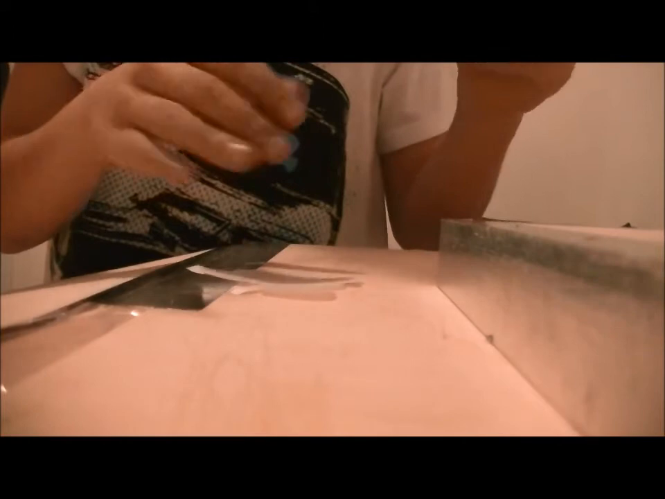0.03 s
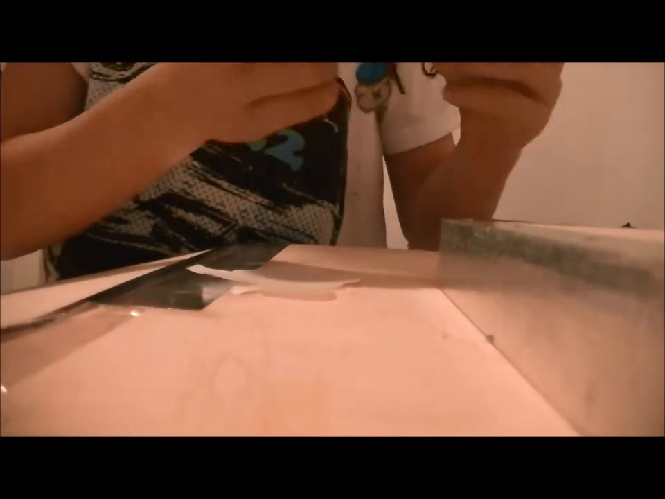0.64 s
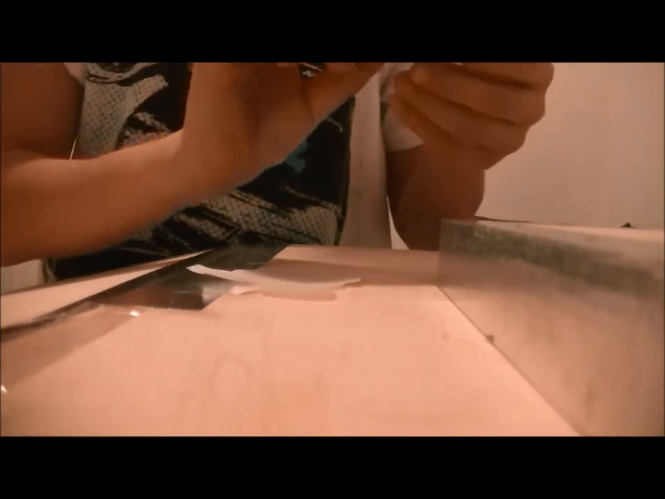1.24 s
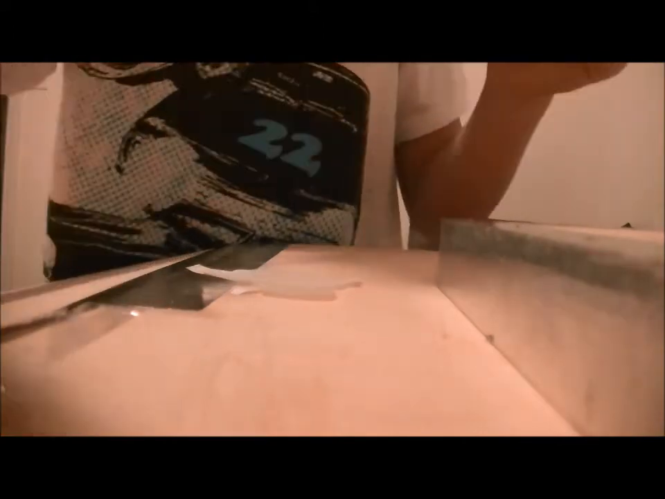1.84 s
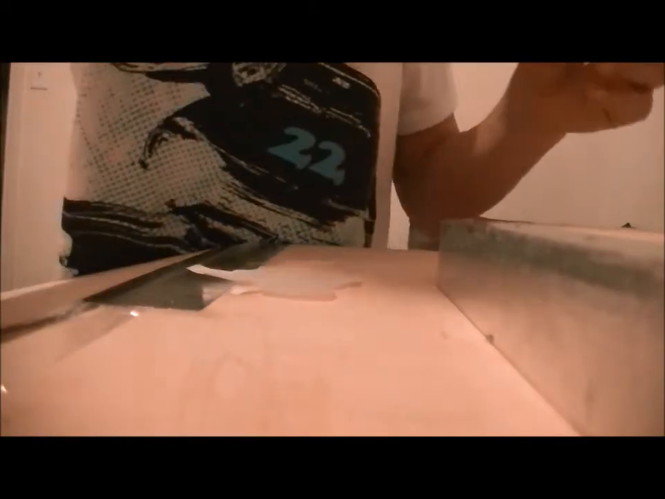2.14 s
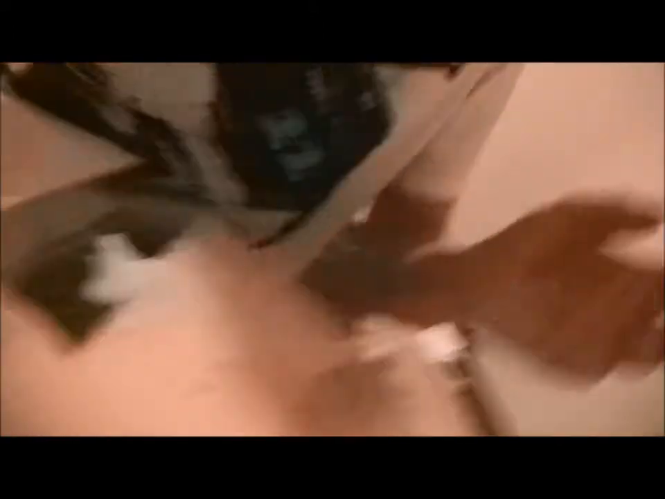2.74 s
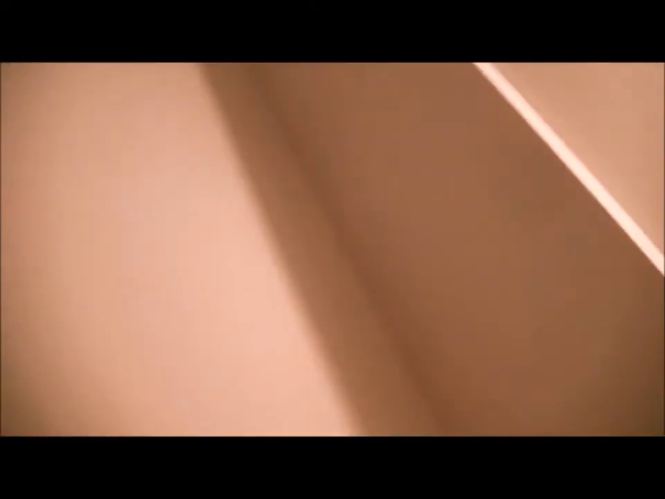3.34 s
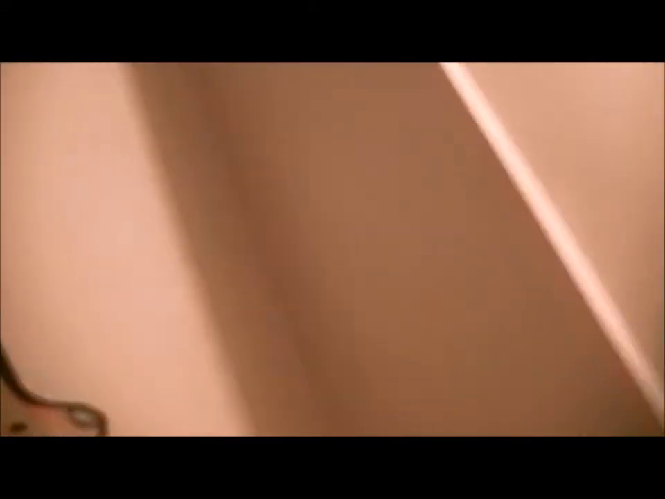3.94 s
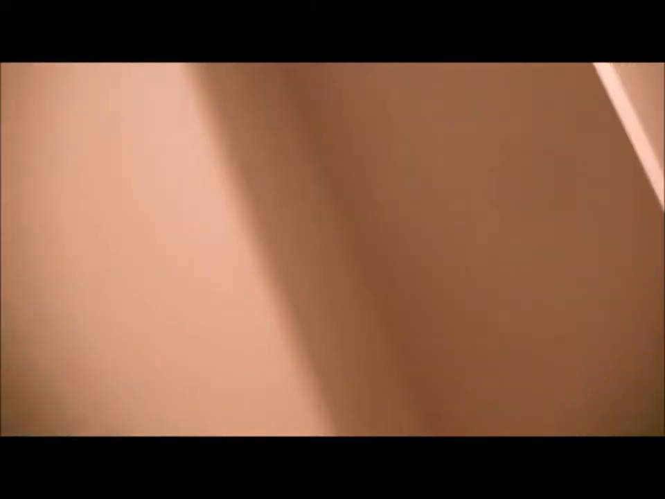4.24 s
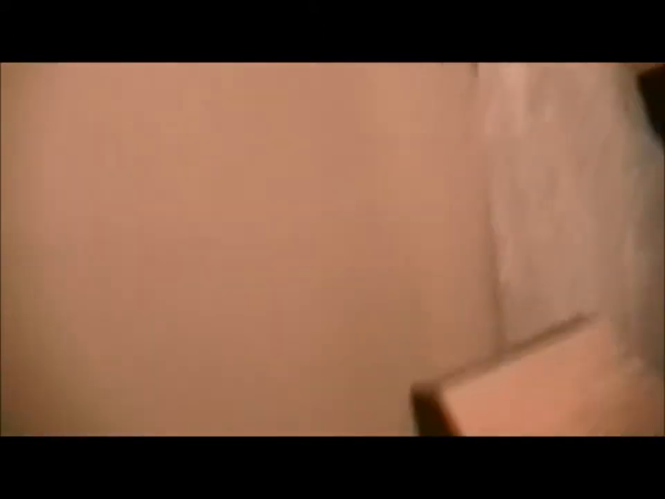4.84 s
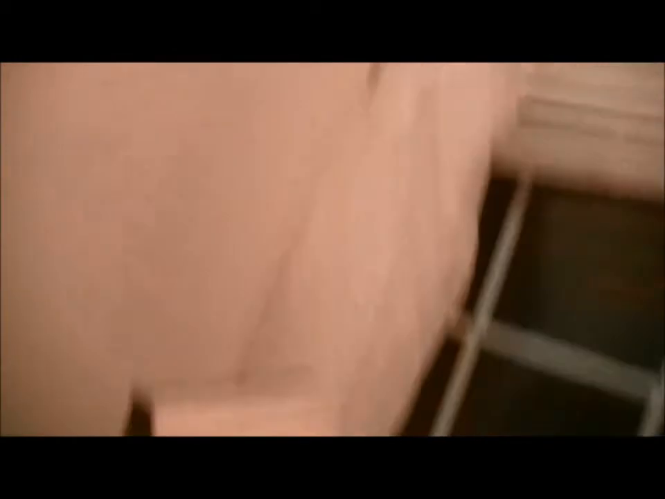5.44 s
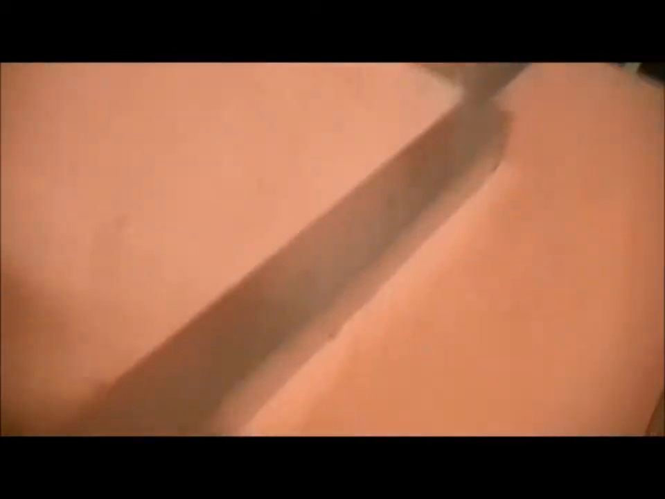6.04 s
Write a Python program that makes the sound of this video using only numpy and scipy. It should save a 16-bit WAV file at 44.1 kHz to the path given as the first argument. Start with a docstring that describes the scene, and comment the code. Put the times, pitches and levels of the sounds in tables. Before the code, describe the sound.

In a quiet room with a steady hiss, tape and paper are fiddled with over a table, giving small snaps and a faint rustle. A sleeve swishes as an arm reaches for the camera, which knocks loudly on the table, judders briefly and knocks again. Then it is carried: right at the microphone, fingers hiss and squeak on the plastic shell, with clicks, low bumps and a few lighter knocks.

```python
"""In a quiet room, tape and paper are fiddled with over a table: small snaps and a faint rustle.
Near 2 s a sleeve swishes as an arm reaches out and grabs a camera. The camera knocks on the table,
judders briefly over its top and knocks again, and both ring with the blows.
Then it is carried: sliding fingers make the plastic shell hiss and squeak, and the shifting grip
gives clicks, low bumps and a few lighter knocks."""
import sys
import numpy as np
from scipy import signal
from scipy.io import wavfile

SR = 44100
rng = np.random.default_rng(int(sys.argv[2]) if len(sys.argv) > 2 else 0)


def wrap_up_sound(samples):
    """Save the sound to the file named by the first command line argument, as 16-bit audio."""
    columns = np.atleast_2d(samples).T
    # keep every value between -1 and 1, then stretch to whole-number steps
    tamed = np.clip(columns, -1, 1)
    steps = np.round(tamed * 32767).astype(np.int16)
    wavfile.write(sys.argv[1], SR, steps)


N = 269004
TIME = np.arange(N) / SR

# Tone colours, or how strong each pitch is in a noise: f/Hz, level/dB
BACKGROUND_COLOUR = [(15, -71), (25, -35), (64, -2.5), (190, -1.5), (229, -4), (354, -4), (962, -10.5),
                     (2550, -13.5), (2840, -13.5), (3340, -14), (3920, -14), (4250, -19), (4740, -15.5),
                     (16000, -26)]  # steady hiss of room and microphone
RUSTLE_COLOUR = [(300, -32), (1400, -5), (3000, 0), (6500, 1), (9000, -0.5), (12000, -16), (16000, -22)]  # tape and paper
SLEEVE_COLOUR = [(100, -11), (480, 0.5), (1000, -4), (1400, -7.5), (2400, -2.5), (4000, -5.5),
                 (7000, -13.5), (15000, -29)]  # brushing cloth
BUMP_COLOUR = [(30, -25), (70, -2), (130, 4), (300, -0.5), (600, -6.5), (900, -1.5), (1500, -20)]  # the shifting grip
DRAG_COLOUR = [(40, -28), (80, -15), (140, 2.5), (280, -5), (430, -3), (580, -1.5), (850, -11), (1200, -9),
               (1700, -29), (3000, -49)]  # the camera's foot on the table
THUD_COLOUR = [(40, -11), (130, 5), (400, 5), (800, 2), (1300, -15.5), (3000, -76)]  # low part of a snap
RING_COLOUR = [(250, -52.5), (650, -11), (1000, -0.5), (1450, 2), (2400, 0.5), (3200, -7), (5500, -54.5)]  # middle part of a snap or rub
CRACK_COLOUR = [(1200, -31.5), (2600, -9), (3500, 5), (4800, 4.5), (5700, 8), (7800, 1.5), (9500, -3),
                (13000, -45)]  # high part of a snap
SNAP_FIZZ_COLOUR = [(4000, -37.5), (7500, -1), (9500, -4.5), (11000, -8), (12500, -13.5), (16000, -20.5)]  # very top of a snap
RUB_HISS_COLOUR = [(1500, -35), (2700, -6.5), (3500, 9.5), (4500, 8), (6300, 6.5), (7700, 1.5),
                   (8600, -12.5), (12000, -23)]  # high part of a rub
RUB_FIZZ_COLOUR = [(4000, -75.5), (8000, 4), (9500, 0.5), (11200, -0.5), (12500, -4.5), (14500, -10),
                   (16000, -30)]  # very top of a rub
# Faint electronic tones: f/Hz, level/dB
WHINE_TONES = [(2880, -73.5), (3847, -74.5), (7690, -83)]
# How long the room echoes (a fade time is the time to drop by 60 dB): f/Hz, fade time/s
ROOM_FADES = [(100, 0.18), (500, 0.56), (2000, 0.36), (7000, 0.25), (16000, 0.072)]
# Modes, the pitches at which a thing likes to ring: f/Hz, width/Hz, level/dB
TAPE_MODES = [(1280, 98, -2), (1640, 190, -10), (2410, 310, 5), (4320, 200, -7), (6960, 590, 3)]  # taut tape
SHELL_MODES = [(1183, 37, 2.5), (1342, 58, 6.5), (1748, 200, 7), (1855, 470, 15), (2197, 280, 13),
               (2350, 85, -16.5)]  # the camera's plastic shell
WALL_MODES = [(3390, 470, -3.5), (4470, 130, 5.5), (5470, 140, 6), (6700, 480, -13), (7330, 340, 9.5),
              (7840, 290, -6)]  # its thin walls, which ring higher
# Camera and table ringing together: f/Hz, level/dB, fade time/s
TABLE_MODES = [(97, -34, 0.47), (139, -44, 0.081), (158.5, -8, 0.056), (290, -11, 0.029), (341, -17, 0.12),
               (347, -1.5, 0.047), (457.5, -17, 0.15), (566, -6, 0.068), (660, 9.5, 0.016),
               (823, -40, 0.048), (1070, -42, 0.046), (1204, -15, 0.036)]

# Movements (swell is the change in level from start to end): t/s, length/s, level/dB, swell/dB
CRINKLES = [(0.296, 0.048, -51, -2), (0.523, 0.062, -49, 7), (0.6, 0.093, -58, -8), (0.844, 0.03, -53.5, 1),
            (0.935, 0.1, -61, 5), (1.165, 0.135, -55, 5), (1.335, 0.035, -55.5, 2), (1.473, 0.012, -53, 0)]  # tape and paper bend between the fingers
SWISHES = [(1.904, 0.45, -49, -18.5)]  # the arm reaches out, fastest at first
DRAGS = [(2.388, 0.1, -22.5, 10)]  # the camera is dragged, pressed ever harder
# Snaps, with three parts set against their level: t/s, relative level/dB, thud/dB, crack/dB, fizz/dB
TAPE_SNAPS = [(0.3137, -49, -21, 8.5, -5), (0.3296, -52, -15, 18.5, 18), (0.5853, -37, -26, -3, 2),
              (0.5876, -37.5, -25, 18, -19), (0.5890, -29, -24, 7.5, -3.5), (0.5905, -26.5, -25, -2.5, -31),
              (0.7401, -40.5, -29, 4, -0.5), (0.8212, -42.5, -9, -6, -19), (0.9427, -65, -8, 12, 19.5),
              (0.9884, -61, -2, 13, 12), (1.1854, -59, -10, 12, 6), (1.2003, -55.5, -3, 15, 13),
              (1.2362, -58.5, -10, 16, 10), (1.2478, -48.5, -6, -2, 5), (1.2627, -35.5, -11.5, 4.5, 7.5),
              (1.2725, -44, -10, -16, -4), (1.2880, -48, 1, -11, -16), (1.3774, -56, -18, 13, 17.5),
              (1.4835, -53.5, -13, 6.5, 1)]  # tape and paper
SHELL_CLICKS = [(2.3298, -46, -16, 3, 9.5), (2.3814, -25, 10.5, 1.5, -3.5), (2.3873, -32, -2, -11, -13),
                (2.5411, -31, -9, 1, -13), (2.7065, -38.5, 12, -2.5, -11), (2.8051, -42, -4, -0.5, -6),
                (2.9374, -26.5, -9.5, -12, -28), (3.1627, -39, -21, -11, -17), (3.541, -46, 5.5, -9, -26),
                (3.623, -31.5, -9, -26, -30), (3.6322, -42, -2, -4, -16), (3.6645, -36.0, -7, -13, -7),
                (3.69, -36.5, -1, -23, -29), (3.7999, -41, -7, -2, -20), (4.321, -19.5, -10, -11, -26),
                (4.3446, -28, -34, -1, -2.5), (4.3505, -34.5, -27, 9, 3), (4.5843, -43, -16, -3.5, -24),
                (4.7366, -35, -18, -16, -27), (4.932, -42, -17, -3, -4), (4.9994, -47.5, -16, 2, 1),
                (5.1693, -46.5, -9, -2, 7), (5.3301, -30.5, -38, -26, -28), (5.695, -36.5, -19, -16, -22),
                (5.7582, -21.5, -48, 0.5, -18), (5.7908, -37.5, -25, 1, -7), (5.805, -30.5, -33, -6, -8),
                (5.8126, -32, -22, -5, -12), (5.9001, -16, -17.5, -4, -0.5), (6.0384, -34.5, -20, 1.5, 6.5),
                (6.0526, -29, -10, -4.5, -8)]  # plastic under the grip
# Shifts of the grip: t/s, length/s, relative level/dB
GRIPS = [(2.256, 0.2, -46), (2.79, 0.078, -48.5), (2.99, 0.25, -52), (3.53, 0.1, -57.5), (3.597, 0.2, -49),
         (4.007, 0.09, -47.5), (4.156, 0.12, -61), (4.648, 0.15, -57), (4.855, 0.051, -52),
         (5.772, 0.059, -45.5), (5.957, 0.085, -52)]
# Finger strokes, with two parts set against their level:
# t/s, length/s, level/dB, swell/dB, hiss/dB, fizz/dB
RUBS = [(2.227, 0.083, -41.5, 5, -2, -14), (2.368, 0.12, -36, 4, -5.5, -15.5),
        (2.586, 0.09, -50, -1, -11, -25), (2.79, 0.037, -45, -3, -14, -27),
        (2.86, 0.065, -39, -5, -5.5, -10.5), (3.04, 0.13, -58, 4, 1, -9), (3.19, 0.03, -47, -2, -1.5, -15),
        (3.324, 0.16, -59, 5, -18, -25), (3.494, 0.079, -51, 2, -19, -24),
        (3.578, 0.044, -50.5, -13, 2, -12), (3.659, 0.019, -36, -23, -1.5, -13),
        (3.713, 0.051, -42.5, -0.5, -6, -20), (3.783, 0.012, -43.5, 1, -14, -13),
        (3.846, 0.093, -48.5, 4, -4.5, -12), (3.926, 0.098, -39.5, 0, -8, -14),
        (4.012, 0.088, -36, 3, -4.5, -12), (4.119, 0.037, -38, -7, -8, -17),
        (4.161, 0.095, -40, 0.5, -1, -16), (4.266, 0.069, -41, 15, -10.5, -19),
        (4.353, 0.33, -52, -12.5, -3, -7.5), (4.639, 0.05, -47.5, -13, 0.5, 3),
        (4.68, 0.18, -55, 6, -1.5, -8), (4.821, 0.11, -40, -1.5, 4, -5), (5.027, 0.14, -47.5, 2.5, -2, -7),
        (5.179, 0.056, -40, 3.5, 2.5, -1), (5.258, 0.2, -41.5, 9.5, -0.5, -4),
        (5.464, 0.096, -42.5, 5, 1, -0.5), (5.566, 0.18, -45, -1, -1.5, -5.5),
        (5.809, 0.045, -36, 1, -6, -12), (5.851, 0.031, -32, 4.5, -3, -9), (5.909, 0.1, -47, 2, -4, -10)]
# Skin squeaks where it grips hardest, and a thin ring near 4.4 kHz in two strokes: t/s, length/s, level/dB,
# f/Hz
SQUEAKS = [(2.276, 0.1, -42.5, 1635), (2.885, 0.08, -44, 2110), (3.587, 0.043, -53, 4370),
           (3.653, 0.027, -46, 1600), (3.712, 0.03, -52, 4360), (4.824, 0.04, -36.5, 1850),
           (5.123, 0.029, -44, 1680), (5.265, 0.044, -40, 1710)]
# Blows, and the ring of the spot they hit, set against the blow:
# t/s, relative level/dB, contact time/ms, spot f/Hz, spot level/dB
KNOCKS = [(0.819, -39, 2.1, 149, -6), (1.288, -35, 2.8, 130, -12), (2.38, -4, 1.1, 312, -20),
          (2.3862, 2, 2.4, 166, -15), (2.3968, 2, 2.47, 262, -7), (2.4275, -29, 1.1, 332, -18),
          (2.4618, -20.5, 0.93, 144, -12), (2.471, -14, 0.87, 545, 4), (2.7065, -39, 0.42, 441, 23.5),
          (2.7108, -34.5, 1, 106, 4), (3.622, -38.5, 1.1, 687, 6), (4.3205, -27, 2, 326, 11.5),
          (6.0526, -33, 1.7, 156, -1.5)]


def amp(db):
    """Turns decibels into a number to multiply by."""
    return 10 ** (np.asarray(db) / 20)


def evened(x):
    """Scales a sound to an average power of 1."""
    return x / np.sqrt(np.mean(x ** 2) + 1e-20)


def value_at(points, hz):
    """Looks up a pitch in a table, filling in between its rows."""
    f, value = np.transpose(points)
    return np.interp(np.log(hz + 1), np.log(f), value)


def add(mix, start_s, sound):
    """Mixes a sound in at the given time."""
    part = mix[round(start_s * SR):][:len(sound)]
    part += sound[:len(part)]


def wander(per_s):
    """A random line that heads for a new value per_s times a second."""
    return np.interp(TIME * per_s, np.arange(N), rng.standard_normal(N))


def colour(x, points, size=4096):
    """Gives a sound a tone colour, with nothing heard ahead of its start."""
    log_gain = np.log(amp(value_at(points, abs(np.fft.fftfreq(size, 1 / SR)))))
    taps = np.fft.ifft(np.exp(np.conj(signal.hilbert(log_gain)))).real
    return signal.oaconvolve(x, taps[:size // 2])[:len(x)]


def resonate(x, modes):
    """Lets a sound set a thing's modes ringing."""
    return sum(amp(db) * signal.lfilter(*signal.iirpeak(hz, hz / width, SR), x)
               for hz, width, db in modes)


def glide(x, hz, width_hz):
    """Lets a sound ring at one moving pitch."""
    turn = np.exp(2j * np.pi * np.cumsum(hz) / SR)
    decay = np.exp(-np.pi * width_hz / SR)
    return (turn * signal.lfilter([1], [1, -2 * decay, decay ** 2], x / turn)).real


def strokes(starts, lengths, levels_db, swells_db=0, *, rise_s, fade_s):
    """Loudness over time of some movements: each rises, swells or sinks, then dies away."""
    power = np.zeros(N)
    for start, length, db, swell_db in np.broadcast(starts, lengths, levels_db, swells_db):
        t = np.arange(0, length + fade_s, 1 / SR)
        held_db = db + swell_db * (np.minimum(t / length, 1) - 0.5)
        lift_db = -60 * np.maximum(t - length, 0) / fade_s
        add(power, start, (np.minimum(t / rise_s, 1) * amp(held_db + lift_db)) ** 2)
    return np.sqrt(power)


def friction(slips_per_s, spread_db, smooth, flutter_db, flutter_hz):
    """Rubbing: tiny uneven slips over smooth noise, in clumps as the pressure wavers."""
    sizes = amp(spread_db * np.minimum(rng.exponential(1, N), 4))
    slips = sizes * rng.choice([-1, 1], N) * (rng.random(N) < slips_per_s / SR)
    sliding = evened(slips) + smooth * rng.standard_normal(N)
    return evened(sliding * amp(flutter_db * wander(flutter_hz)))


def background(hiss_db=-54):
    """Steady hiss with a few thin electronic tones."""
    whine = sum(amp(db) * np.sqrt(2) * np.sin(2 * np.pi * hz * TIME) for hz, db in WHINE_TONES)
    return amp(hiss_db) * evened(colour(rng.standard_normal(N), BACKGROUND_COLOUR)) + whine


def room_echo(x, build_s=0.002):
    """Sound bounces around a small room, each pitch dying at its own speed."""
    hz, t, noise = signal.stft(rng.standard_normal(SR // 2), SR, nperseg=256)
    fade = amp(-60 * t / value_at(ROOM_FADES, hz)[:, None])
    tail = signal.istft(noise * fade, SR, nperseg=256)[1]
    tail *= 1 - np.exp(-(TIME[:len(tail)] / build_s) ** 2)
    return signal.fftconvolve(x, tail / np.linalg.norm(tail))[:N]


def stray_ticks(level_db=-66.5, per_s=16, spread_db=3):
    """Fingernails and creases give faint ticks all along."""
    sizes = amp(spread_db * np.minimum(rng.exponential(1, N), 2))
    ticks = sizes * (rng.random(N) < per_s / SR)
    return amp(level_db) * evened(colour(ticks, RUSTLE_COLOUR))


def rustle():
    """Tape and paper crinkle finely as they bend."""
    bending = strokes(*np.transpose(CRINKLES), rise_s=0.0066, fade_s=0.1)
    creases = friction(1500, spread_db=3.2, smooth=0.6, flutter_db=1.2, flutter_hz=81.1)
    return bending * evened(colour(creases, RUSTLE_COLOUR))


def sleeve_swish():
    """Cloth brushes along as the arm reaches out."""
    reach = strokes(*np.transpose(SWISHES), rise_s=0.1, fade_s=0.2)
    cloth = friction(2200, spread_db=3.5, smooth=0.77, flutter_db=1.4, flutter_hz=80)
    return reach * evened(colour(cloth, SLEEVE_COLOUR))


def grip_bumps(gain_db=-1, restless_from_s=1.9):
    """Shifts of the grip make low, lumpy bumps, and the hand never quite rests."""
    shifts = strokes(*np.transpose(GRIPS), rise_s=0.017, fade_s=0.3)
    restless = amp(-61.5) * (TIME > restless_from_s)
    bumps = friction(300, spread_db=5.8, smooth=0.54, flutter_db=2.8, flutter_hz=40)
    return amp(gain_db) * np.hypot(shifts, restless) * evened(colour(bumps, BUMP_COLOUR))


def hand_echoes(x, strength=0.31, drift=0.3):
    """Very short echoes off the moving hands keep changing the tone colour."""
    echoes = np.zeros(N)
    for delay_s in 0.0007, 0.0016:
        lag = np.round(delay_s * np.exp(drift * wander(16)) * SR).astype(int)
        echoes += np.take(x, np.arange(N) - lag, mode="wrap")
    return evened(x + strength * echoes)


def skin_squeaks(slips):
    """Skin catches and lets go, so each squeak breaks into short chirps."""
    start, length, level, hz = np.transpose(SQUEAKS)
    pitch = hz[np.searchsorted(start, TIME) - 1] * np.exp(0.037 * wander(70))
    chirps = evened(glide(slips, pitch, width_hz=230) * amp(4 * wander(56)))
    return chirps * strokes(start, length, level, rise_s=0.015, fade_s=0.11)


def finger_rubs():
    """Skin slides on plastic: the same slips ring the shell, hiss above it and squeak."""
    start, length, level, swell, hiss_db, fizz_db = np.transpose(RUBS)
    slips = hand_echoes(friction(2200, spread_db=3.5, smooth=1, flutter_db=1.14, flutter_hz=170))
    middle, high = colour(slips, RING_COLOUR), colour(slips, RUB_HISS_COLOUR)
    ring = evened(evened(resonate(middle, SHELL_MODES)) + 0.81 * evened(middle))
    hiss = evened(evened(resonate(high, WALL_MODES)) + 3.6 * evened(high))
    fizz = evened(colour(slips, RUB_FIZZ_COLOUR))
    sliding = sum(part * strokes(start, length, level + db, swell, rise_s=0.015, fade_s=0.11)
                  for part, db in [(ring, 0), (hiss, hiss_db), (fizz, fizz_db)])
    return sliding + skin_squeaks(slips)


def snaps(rows, modes, ringing, chatter, thud_s, ring_s, crack_s, gain_db=-2):
    """Tape or plastic lets go: one sharp kick, then chatter that fades fastest in the high notes."""
    out, t = np.zeros(N), np.arange(2048) / SR
    head = SR // 170  # the first 6 ms set each part's level
    for start, db, thud_db, crack_db, fizz_db in rows:
        noise = chatter * rng.standard_normal(len(t))
        parts = [(THUD_COLOUR, thud_db, thud_s), (RING_COLOUR, 0, ring_s),
                 (CRACK_COLOUR, crack_db, crack_s), (SNAP_FIZZ_COLOUR, fizz_db, crack_s)]
        for tone, part_db, fade_s in parts:
            burst = colour((t == 0) + noise * amp(-60 * t / fade_s), tone)
            if tone is RING_COLOUR or tone is CRACK_COLOUR:
                burst = burst + ringing * resonate(burst, modes)
            add(out, start, amp(db + part_db) * burst / np.sqrt(np.mean(burst[:head] ** 2)))
    return amp(gain_db) * out


def camera_drag(table_share=0.36):
    """The camera's foot judders over the table top and keeps the table ringing."""
    slips = friction(900, spread_db=2, smooth=0.63, flutter_db=1.9, flutter_hz=150)
    pressure = strokes(*np.transpose(DRAGS), rise_s=0.013, fade_s=0.12)
    judder = pressure * evened(colour(slips, DRAG_COLOUR))
    # the longer a mode rings, the narrower it is
    modes = [(hz, np.log(1000) / np.pi / fade_s, 0) for hz, _, fade_s in TABLE_MODES]
    return (1 - table_share) * judder + table_share * resonate(judder, modes)


def camera_knocks(strength=0.63, spot_cycles=22, lowest_hz=75):
    """Each blow is a short push that rings table and camera; a longer contact sounds duller."""
    out, t = np.zeros(N), np.arange(SR // 2) / SR
    ring = sum(amp(db - 60 * t / fade_s) * np.cos(2 * np.pi * hz * t) for hz, db, fade_s in TABLE_MODES)
    for start, db, contact_ms, spot_hz, spot_db in KNOCKS:
        push = np.sin(np.pi * np.minimum(t * 1000 / contact_ms, 1))
        spot = amp(spot_db - 60 * t * spot_hz / spot_cycles) * np.cos(2 * np.pi * spot_hz * t)
        add(out, start, -strength * amp(db) * signal.fftconvolve(push / push.sum(), ring + spot))
    return signal.sosfilt(signal.butter(2, lowest_hz, "high", fs=SR, output="sos"), out)


def scene():
    """Mixes it all: the tape gets a little room echo, whatever touches the camera even less."""
    tape = snaps(TAPE_SNAPS, TAPE_MODES, ringing=0.7, chatter=0.16,
                 thud_s=0.048, ring_s=0.02, crack_s=0.01)
    tape += rustle() + stray_ticks()
    clicks = snaps(SHELL_CLICKS, SHELL_MODES + WALL_MODES, ringing=0.21, chatter=0.15,
                   thud_s=0.072, ring_s=0.036, crack_s=0.015)
    camera = clicks + camera_knocks() + camera_drag() + finger_rubs() + grip_bumps()
    direct = tape + camera + sleeve_swish()
    echo = room_echo(amp(-18) * tape + amp(-21.5) * camera)
    return (direct + echo + background())[None]


def record(dry):
    """Flattens any peak beyond full scale, then cuts the highs above 16 kHz."""
    high_cut = signal.firwin(255, 16000, window=("kaiser", 8), fs=SR)
    return signal.oaconvolve(np.clip(dry, -1, 1), high_cut[None], "same")


dry = scene()
out = record(dry)
wrap_up_sound(out)
```